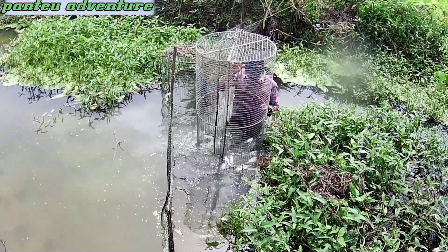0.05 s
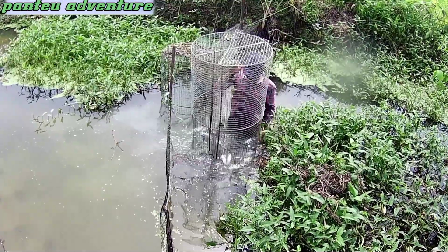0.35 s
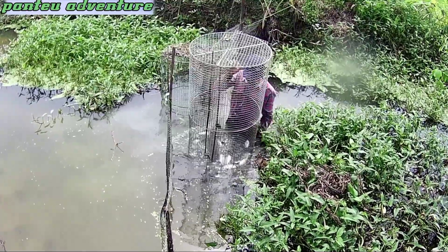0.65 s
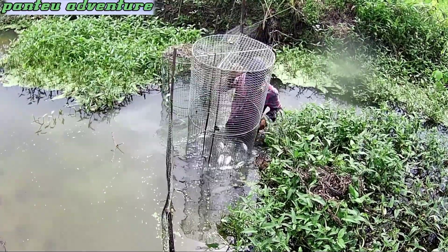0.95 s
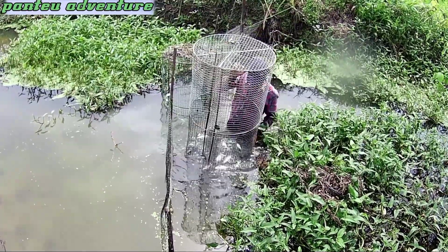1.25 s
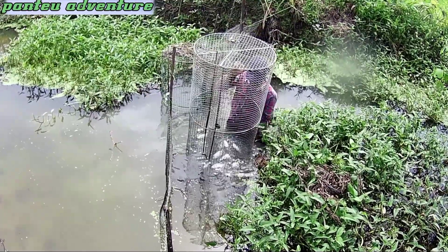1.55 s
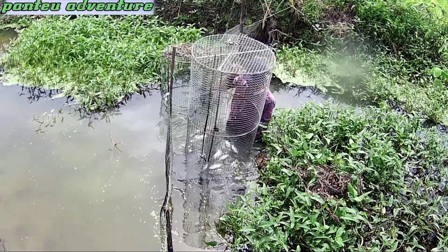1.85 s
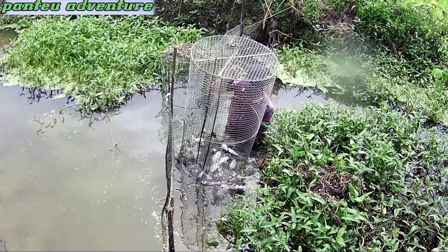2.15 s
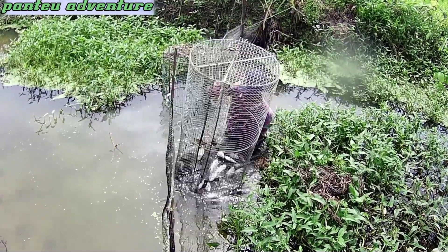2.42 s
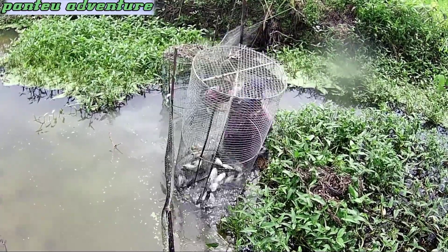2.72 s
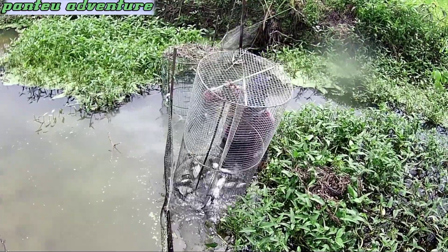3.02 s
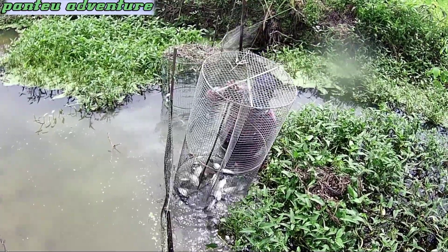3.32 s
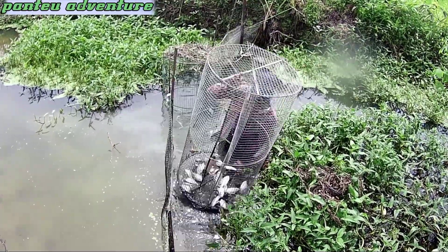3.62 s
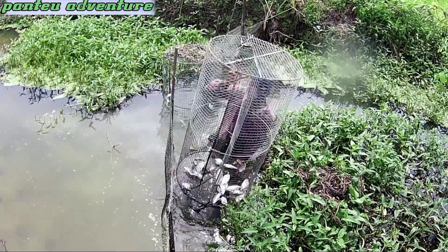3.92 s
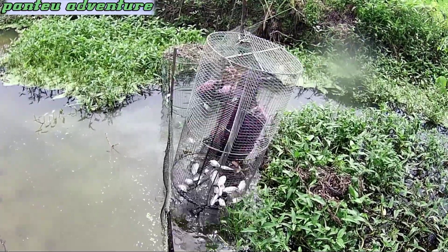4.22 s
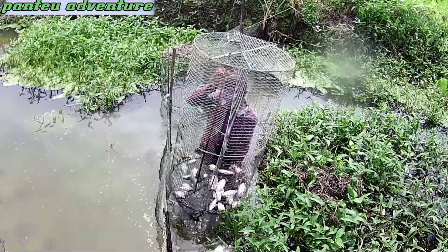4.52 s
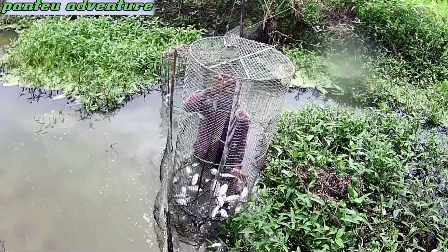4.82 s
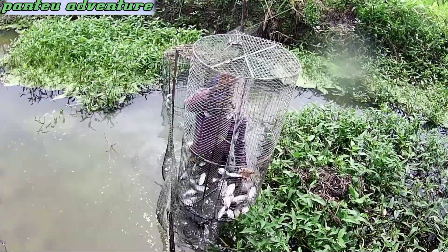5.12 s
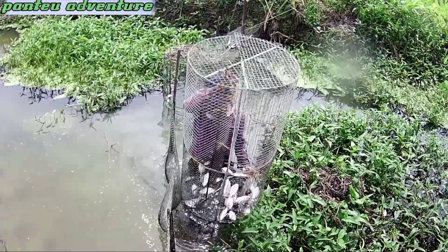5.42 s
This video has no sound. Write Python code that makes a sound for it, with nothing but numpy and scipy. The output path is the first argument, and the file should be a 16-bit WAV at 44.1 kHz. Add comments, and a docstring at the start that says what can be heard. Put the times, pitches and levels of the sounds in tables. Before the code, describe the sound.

Water sloshes and plops in short bursts as someone shifts a wire fish trap in a shallow ditch. After a brief lull, the fish thrash in a run of sharp slaps and splashes, with a few ticks from the wires. The water then settles to drips and bubbles, and the trap scrapes faintly on the bank. Wind rumbles on the microphone in gusts, and everything is heard on the left only.

```python
"""Water surges through a wire fish trap as someone wading in a ditch tips and drags it; the fish thrash.
Slaps throw spray, trapped air rings as bubbles, the wet mesh drips, and the wires tick and scrape.
Gusts rumble on the single microphone, which feeds the left channel only.
A far tone fades and something small chirps in the weeds."""
import sys
import numpy as np
from scipy import signal
from scipy.fft import rfft, irfft
from scipy.io import wavfile
from scipy.ndimage import uniform_filter1d

SR = 44100
rng = np.random.default_rng(int(sys.argv[2]) if len(sys.argv) > 2 else 0)


def to_wav(sig):
    """Store sig (one row per channel, or 1-D mono) as 16-bit WAV at the path in sys.argv[1].

    Samples outside -1..1 are clipped; the rate is SR.
    """
    pcm = np.clip(np.atleast_2d(sig), -1, 1) * 32767
    pcm = np.round(pcm).astype(np.int16)
    wavfile.write(sys.argv[1], SR, pcm.T)  # frames by channels


N = 249914
TIME = np.arange(N) / SR

# Water dribbling from the trap between surges. Each row: time in seconds, level in dB.
DRIBBLE_LEVELS = [(0, -79), (1.1, -80), (1.5, -85), (2.1, -88), (2.45, -75), (3.2, -66), (3.55, -80),
                  (4.8, -80), (5.1, -83.5), (5.67, -84)]


def undb(db):
    """Decibels to gain."""
    return 10 ** (np.asarray(db) / 20)


def unit(x):
    """Scale to rms 1."""
    return x / np.sqrt(np.mean(x ** 2) + 1e-18)


def curve(table):
    """Interpolate (seconds, value) rows to one value per sample."""
    return np.interp(TIME, *np.transpose(table))


def add(out, start_s, sound):
    """Mix a sound in at start_s."""
    i = int(np.clip(start_s * SR, 0, N - 1))
    out[i:i + len(sound)] += sound[:N - i]


def colour(x, spectrum, size=4096):
    """Minimum-phase filter from (Hz, dB) rows; white noise keeps its power."""
    hz, db = np.transpose(spectrum)
    log_hz = np.log(np.maximum(np.arange(size // 2 + 1) * SR / size, 1))
    magnitude = undb(np.interp(log_hz, np.log(np.sort(hz)), db))
    cepstrum = irfft(np.log(magnitude))
    response = irfft(np.exp(rfft(2 * cepstrum[:size // 2], size)))
    return signal.fftconvolve(x, response / np.linalg.norm(response))[:N]


def steady(x, window_s):
    """Hold rms near 1 over the window; faster flutter stays."""
    k = max(int(window_s * SR), 2)
    power = uniform_filter1d(uniform_filter1d(x ** 2, k), k)
    return x / np.sqrt(np.abs(power) + 1e-12)


def flutter(rate_hz):
    """Random values joined by ramps, rms 1."""
    k = max(int(SR / rate_hz), 2)
    steps = np.repeat(rng.standard_normal(N // k + 1), k)
    return unit(uniform_filter1d(steps, k)[:N])


def hold_gain(start_s, hold_s, rise_db_per_s, fall_db_per_s):
    """Gain that reaches 1 at start_s, holds, then falls."""
    before_s = np.maximum(start_s - TIME, 0)
    after_s = np.maximum(TIME - start_s - hold_s, 0)
    return undb(-rise_db_per_s * before_s - fall_db_per_s * after_s)


def pooled_db(gains):
    """Power sum of unrelated sounds, in dB."""
    return 10 * np.log10(sum(g ** 2 for g in gains))


def bubble(hz, t60_s, rise=0.27, onset_cycles=0.85):
    """An air pocket rings; nearing the surface, its pitch climbs by the fraction rise."""
    t = np.arange(int(t60_s * SR) + 2) / SR
    onset = 1 - np.exp(-(t * hz / onset_cycles) ** 2)
    envelope = onset * np.exp(-np.log(1000) * t / t60_s)
    return envelope / envelope.max() * np.sin(2 * np.pi * hz * t * (1 + rise * t / t60_s / 2))


def impacts(per_s, spread_db):
    """Tiny impulses at random times: many weak, a few strong."""
    hits = rng.random(N) < per_s / SR
    signs = rng.choice([-1, 1], N)
    level_db = spread_db * np.minimum(rng.exponential(size=N), 5)
    return unit(hits * signs * undb(level_db))


def froth(low_hz, high_hz, cycles, spread_db, count):
    """A crowd of small, short-lived bubbles."""
    out = np.zeros(N)
    for when, pitch, life, strength in rng.random((count, 4)):
        hz = low_hz * (high_hz / low_hz) ** pitch
        gain = undb(-spread_db * np.log(strength + 0.0042))
        add(out, when * N / SR, gain * bubble(hz, t60_s=cycles * (0.5 + life) / hz))
    return unit(out)


def waterflow(dribble_spray_db=-9.5):
    """Splash and spray levels in dB: each surge starts fast, pours, then drains to a dribble."""
    # Each row: start in seconds, hold in seconds, splash level in dB, spray in dB re splash.
    surges = [(0.0, 0.086, -63, -13), (0.14, 0.075, -67.5, -12.5), (0.297, 0.056, -71, -18),
              (0.867, 0.092, -68.5, -22), (0.967, 0.044, -65, -15.5), (1.068, 0.062, -74.5, -18),
              (2.174, 0.036, -68.5, -4.5), (2.222, 0.04, -55.5, -12.5), (2.294, 0.043, -59.5, -11),
              (2.414, 0.039, -65, -8), (2.658, 0.026, -67, -4.5), (2.715, 0.1, -67.5, -4),
              (2.855, 0.18, -67, -4.5), (3.004, 0.093, -66, -8), (3.083, 0.14, -60.5, -11.5),
              (3.366, 0.022, -60.5, -14), (3.707, 0.037, -71.5, -14), (4.136, 0.3, -74, -26),
              (4.615, 0.092, -74.5, -10)]
    dribble = undb(curve(DRIBBLE_LEVELS))
    splash, spray = [dribble], [dribble * undb(dribble_spray_db)]
    for start_s, hold_s, splash_db, spray_db in surges:
        surge = undb(splash_db) * hold_gain(start_s, hold_s, rise_db_per_s=552, fall_db_per_s=215)
        splash.append(surge)
        spray.append(undb(spray_db) * surge)
    return pooled_db(splash), pooled_db(spray)


def mic_splash(x):
    """Shape x as midrange splashing, coloured by the microphone's resonances."""
    # Each row: frequency in Hz, level in dB.
    mic_splash_spectrum = [(350, -17.5), (650, -7), (860, -4), (1170, -6.5), (1330, -1), (1680, -3),
                           (1920, -0.5), (2080, -2), (2370, 1.5), (2650, -3.5), (2980, -15), (3170, -15.5),
                           (3600, -27.5), (6000, -58.5)]
    return colour(x, mic_splash_spectrum)


def mic_spray(x):
    """Shape x as bright spray, coloured by the microphone's treble resonances."""
    # Each row: frequency in Hz, level in dB.
    mic_spray_spectrum = [(1800, -32.5), (3200, 1), (3750, -9.5), (4450, 3.5), (4800, -0.5), (5700, -17.5),
                          (6300, -13), (6900, -27.5), (7500, -16), (8100, -25.5), (8850, -13), (9700, -24),
                          (11000, -22.5), (15000, -37.5)]
    return colour(x, mic_spray_spectrum)


def sloshing(gurgle_db=-13):
    """Water pours through the mesh in short gushes: drops, bubbles, a lower gurgle and fine spray."""
    splash_db, spray_db = waterflow()
    drops = impacts(per_s=2500, spread_db=0.5)
    bubbles = froth(low_hz=526, high_hz=3033, cycles=47, spread_db=4, count=3000)
    gushes = undb(3.5 * flutter(rate_hz=70))
    splash = steady(mic_splash((drops + undb(-2.5) * bubbles) * gushes), window_s=0.025)
    gurgle = steady(froth(low_hz=382, high_hz=763, cycles=28, spread_db=3, count=500), window_s=0.06)
    fine_drops = impacts(per_s=2300, spread_db=0.5)
    spray = steady(mic_spray(fine_drops * gushes), window_s=0.1)
    return undb(splash_db - 1) * (splash + undb(gurgle_db) * gurgle) + undb(spray_db - 4) * spray


def airflow(breeze_eddy_db=-16.5):
    """Rumble and eddy levels in dB: each gust builds, holds and dies away over the breeze."""
    # Each row: time in seconds, rumble level in dB.
    breeze_levels = [(0, -53), (1.1, -50.5), (1.4, -63.5), (1.85, -68), (2.1, -56), (2.9, -57.5),
                     (3.13, -62.5), (3.5, -57), (3.85, -46), (4.7, -49), (5.05, -59.5), (5.67, -59)]
    # Each row: arrival in seconds, hold in seconds, rumble level in dB, eddy level in dB.
    gusts = [(0.0, .12, -49, -89), (0.288, 0.035, -37, -60), (0.354, 0.052, -43, -61.5),
             (0.496, 0.047, -37.5, -56), (0.644, 0.063, -40.5, -61), (0.796, .17, -40, -63.5),
             (1.036, 0.042, -42.5, -61), (1.193, 0.13, -49, -76), (1.449, 0.021, -52, -68),
             (1.921, 0.1, -53.5, -72), (2.061, 0.043, -48, -82), (2.191, 0.19, -42, -57.5),
             (2.414, 0.06, -47.5, -61), (2.574, 0.024, -45.5, -61.5), (2.653, 0.13, -43, -56),
             (2.851, 0.086, -45, -62), (3.214, 0.041, -59, -83), (3.41, 0.023, -45.5, -56.5),
             (3.531, 0.022, -39, -68.5), (3.601, .035, -33.5, -51.5), (3.654, 0.042, -33, -41.5),
             (3.725, 0.083, -39, -49), (3.964, 0.086, -42, -56.5), (4.082, 0.067, -38, -48.5),
             (4.164, 0.082, -32.5, -42.5), (4.272, 0.067, -35, -49), (4.399, .07, -42.5, -57),
             (4.507, 0.15, -43.5, -75), (4.768, .09, -48.5, -64.5), (5.173, 0.043, -54, -73),
             (5.436, 0.0069, -48.5, -58.5)]
    breeze = undb(curve(breeze_levels))
    rumble, eddies = [breeze], [breeze * undb(breeze_eddy_db)]
    for start_s, hold_s, rumble_db, eddy_db in gusts:
        gust = hold_gain(start_s, hold_s, rise_db_per_s=450.5, fall_db_per_s=328.5)
        rumble.append(undb(rumble_db) * gust)
        eddies.append(undb(eddy_db) * gust)
    return pooled_db(rumble), pooled_db(eddies)


def wind(bass_hz=95, bass_limit_db=-43, swell_db=-58, swell_slope=0.62):
    """Large eddies rumble on the microphone; strong gusts break into finer, fluttering ones."""
    # Large eddies, fine eddies and the deepest pressure swell. Each row: frequency in Hz, level in dB.
    rumble_spectrum = [(10, -44), (25, -20), (50, -7), (75, 2), (110, 2), (150, -1.5), (185, -4.5),
                       (250, -13.5), (330, -20), (500, -42.5), (900, -52), (1500, -100)]
    eddy_spectrum = [(40, -45.5), (130, -12.5), (230, 5), (330, 2.5), (450, 0.5), (600, -2), (780, -11.5),
                     (1000, -25.5), (1500, -49), (3000, -57), (6000, -87)]
    swell_spectrum = [(5, -28.5), (15, -15.5), (25, -14.5), (45, 1), (75, -2), (110, -7), (200, -34),
                      (700, -110)]
    rumble_db, eddy_db = airflow()
    rumble = steady(colour(rng.standard_normal(N), rumble_spectrum), window_s=0.043)
    turbulence = rng.standard_normal(N) * undb(4.3 * flutter(rate_hz=130))
    eddies = steady(colour(turbulence, eddy_spectrum), window_s=0.035)
    swell = steady(colour(rng.standard_normal(N), swell_spectrum), window_s=0.31)
    # Faster air makes smaller eddies, so the swell grows less than the rest.
    swell_gain = undb(swell_db + swell_slope * (rumble_db - rumble_db.mean()))
    bass = signal.sosfiltfilt(signal.butter(3, bass_hz, fs=SR, output="sos"), rumble)
    limited_rumble = undb(rumble_db) * (rumble - bass) + undb(np.minimum(rumble_db, bass_limit_db)) * bass
    return limited_rumble + undb(eddy_db + 0.23) * eddies + swell_gain * swell


def outdoor_air(level_db=-69.5):
    """Quiet, steady outdoor air and hiss."""
    # Each row: frequency in Hz, level in dB.
    air_spectrum = [(30, 2), (150, -2.5), (300, -11.5), (650, -13), (1000, -24.5), (1600, -29),
                    (2200, -33.5), (3100, -33), (3900, -33), (4600, -32), (5500, -34), (15500, -32.5)]
    return undb(level_db) * colour(rng.standard_normal(N), air_spectrum)


def far_tone(hz=739, waver=0.00099):
    """A faint, nearly pure tone like a far horn, wavering on the wind."""
    # Each row: time in seconds, level in dB.
    tone_levels = [(0, -73), (.25, -73), (.33, -90), (.44, -69), (.52, -85), (.7, -130)]
    pitch_hz = hz * (1 + waver * flutter(rate_hz=14))
    return undb(curve(tone_levels)) * unit(np.sin(2 * np.pi * np.cumsum(pitch_hz) / SR))


def plops(twin_db=-11, twin_ratio=1.13, scatter_s=0.035, scatter_db=-11.5):
    """Single larger bubbles from drips and fish, scattered a little by the banks."""
    # Each row: start in seconds, pitch in Hz, level in dB, t60 in seconds, fractional pitch rise.
    bubbles = [(0.0644, 2056, -58, 0.078, 0), (0.1377, 1760, -58, .027, .12),
               (0.203, 2070, -58.5, 0.081, 0.19), (0.289, 1270, -57, 0.048, 0.31),
               (0.3204, 2120, -52, 0.028, .16), (0.3312, 810, -54.5, 0.043, 0.12),
               (0.41, 1110, -65, 0.073, .33), (0.882, 1560, -53.5, 0.033, 0.22),
               (0.9126, 1291, -49, 0.057, 0.072), (1.0019, 793, -47, 0.047, 0.21),
               (1.0842, 2281, -61, 0.028, .05), (1.139, 848, -57, 0.039, 0.076),
               (1.1513, 2320, -53.5, 0.019, 0.27), (1.2174, 753, -59.5, .11, 0.044),
               (1.3635, 770, -50, 0.043, 0), (1.6359, 2030, -68.5, .031, 0),
               (1.972, 623, -64, 0.066, 0.018), (2.1703, 1630, -51, .026, .12),
               (2.1996, 2060, -43, 0.043, 0), (2.4243, 1820, -53, 0.031, 0.27),
               (2.5141, 1470, -61.5, 0.065, 0.033), (2.813, 1336, -49.5, 0.027, .12),
               (2.91, 2290, -47, 0.044, 0.26), (2.914, 4390, -51, 0.03, 0.3),
               (2.967, 1045, -54, 0.031, 0.25), (3.0973, 1850, -45.5, 0.023, .12),
               (3.1416, 1850, -41.5, 0.0094, .09), (3.201, 1440, -46.5, .022, 0),
               (3.3381, 856, -49.5, 0.21, 0.08), (3.369, 2260, -35, 0.023, 0.24),
               (3.7087, 1400, -59, .055, .04), (3.7805, 2240, -59.5, 0.037, 0.051),
               (4.321, 1357, -58, .08, 0.061), (4.366, 1610, -57.5, 0.095, 0.28),
               (4.4722, 1990, -61.5, 0.05, 0.099), (4.5204, 2950, -63, 0.044, 0),
               (4.587, 2130, -55.5, 0.013, 0.11), (4.624, 1835, -52, .03, 0), (4.666, 1290, -60, .1, 0.047),
               (4.7011, 528, -48.5, 0.16, 0.5), (4.9519, 2180, -68.5, 0.033, .06),
               (5.3687, 1550, -71, 0.07, 0.096)]
    out = np.zeros(N)
    for start_s, hz, db, t60_s, rise in bubbles:
        add(out, start_s, undb(db - 1.5) * bubble(hz, t60_s, rise))
        # A smaller twin pinches off just after and roughens the ring.
        detune, lag = rng.standard_normal(2)
        twin_hz = hz * twin_ratio * (1 + 0.06 * detune)
        add(out, start_s + 0.0024 * abs(lag), undb(db + twin_db) * bubble(twin_hz, t60_s, rise))
    t = np.arange(SR // 4) / SR
    banks = rng.standard_normal(len(t)) * np.exp(-t / scatter_s)
    return out + undb(scatter_db) * signal.fftconvolve(out, banks / np.linalg.norm(banks))[:N]


def slaps(crack_s=0.0006, patter_s=0.011, patter_db=-11, thud_db=-7):
    """Fish tails and mesh slap the surface: a crack over a hollow thud, then a patter of thrown water."""
    # Each row: start in seconds, level in dB, spray in dB re that level.
    hits = [(0.067, -49, -18), (0.135, -49.5, -28), (0.3726, -57, -7), (0.511, -49.5, -17.5),
            (0.603, -59.5, -20), (0.639, -66, -4), (0.9403, -56, -27), (1.137, -52, -24),
            (1.3622, -54.5, -20), (2.1274, -48, -5), (2.155, -38, -11.5), (2.2352, -43, -21),
            (2.324, -46, -15), (2.4089, -57.5, -2), (2.55, -44.5, -28), (2.676, -46.5, -9.5),
            (2.6487, -45, -25), (2.7185, -36.5, -16.5), (2.7585, -37.5, -18), (2.7919, -38, -17.5),
            (2.8517, -43, -16), (2.8893, -42, -20), (2.9417, -40, -14.5), (2.977, -48.5, -7.5),
            (3.0321, -36.5, -23), (3.0859, -43, -22), (3.1213, -44, -27), (3.166, -38, -20),
            (3.2011, -43.5, -33), (4.1302, -48, -21.5), (4.364, -53, -27), (4.6618, -47, -30)]
    # Each row: frequency in Hz, level in dB.
    thud_spectrum = [(120, -18), (350, -7.5), (750, -6), (1100, -9), (2500, -45)]
    coarse, fine = np.zeros(N), np.zeros(N)
    t = np.arange(SR // 16) / SR
    for start_s, db, spray_db in hits:
        crack = rng.standard_normal((2, len(t))) * np.exp(-t / crack_s)
        grains = rng.standard_normal((2, len(t))) * np.abs(rng.standard_normal(len(t)))
        coarse_burst, fine_burst = crack + undb(patter_db) * grains * np.exp(-t / patter_s)
        # A slap that throws mostly spray has little body.
        body_gain = undb(db - 6.5) / np.sqrt(1 + undb(2 * spray_db + 5))
        add(coarse, start_s, body_gain * coarse_burst)
        add(fine, start_s, undb(db + spray_db) * fine_burst)
    return mic_splash(coarse) + undb(thud_db) * colour(coarse, thud_spectrum) + mic_spray(fine)


def drips(count=24, low_hz=1455, high_hz=3050, mean_t60_s=0.072, over_dribble_db=6):
    """Faint drips fall from the wet mesh at random, each ringing one small bubble."""
    out = np.zeros(N)
    for when, pitch, life, strength in rng.random((count, 4)):
        hz = low_hz * (high_hz / low_hz) ** pitch
        add(out, when * N / SR, (0.5 + strength) * bubble(hz, mean_t60_s * (0.5 + life), rise=0.14))
    return out * undb(curve(DRIBBLE_LEVELS) + over_dribble_db)


def buffets(width_cycles=0.99):
    """Single hard buffets of air hit the microphone, each a short, low pressure pulse."""
    # Each row: centre in seconds, level in dB, pitch in Hz.
    pulses = [(0.506, -28.5, 190), (0.645, -35, 158), (0.796, -27.5, 127), (2.21, -34.5, 200),
              (2.355, -29.5, 125), (2.776, -28, 125), (3.624, -39, 140), (3.673, -28, 260),
              (4.164, -27, 170), (4.181, -29, 377), (4.209, -27, 199), (4.835, -31.5, 135),
              (5.447, -35.5, 100)]
    out = np.zeros(N)
    for centre_s, db, hz in pulses:
        cycles = np.arange(-2, 2, hz / SR)
        pulse = np.cos(2 * np.pi * cycles) * np.exp(-(cycles / width_cycles) ** 2)
        add(out, centre_s - 2 / hz, undb(db - 4) * pulse)
    return out


def chirps(hz=7300, rise=0.041, length_s=0.0066):
    """Thin chirps in the weeds scoop up to pitch and keep rising slightly."""
    # Each row: start in seconds, level in dB.
    calls = [(.514, -78), (1.78, -78), (3.316, -72), (3.837, -73), (4.048, -72), (4.546, -73.5),
             (4.809, -68.5)]
    out = np.zeros(N)
    progress = np.linspace(0, 1, int(length_s * SR))
    glide = 1 + rise * progress - 0.25 * np.exp(-16 * progress)
    envelope = np.sqrt(np.abs(np.sin(np.pi * progress)))
    for start_s, db in calls:
        pitch_hz = hz * (1 + 0.01 * rng.standard_normal()) * glide
        add(out, start_s, undb(db) * envelope * np.sin(2 * np.pi * np.cumsum(pitch_hz) / SR))
    return out


def wire_ticks(decay_s=0.00091):
    """Wires snap against each other as the trap is tipped."""
    # Each row: start in seconds, level in dB.
    ticks = [(2.1294, -44.5), (2.1557, -70), (2.7188, -69), (2.761, -50), (2.7905, -58), (2.976, -57),
             (3.1665, -59)]
    # Each row: frequency in Hz, level in dB.
    tick_spectrum = [(1200, -21), (2500, -12), (4500, 2), (6200, -1), (7500, -26), (8900, -16),
                     (10500, 2.5), (13000, -15), (15000, -2.5)]
    out = np.zeros(N)
    t = np.arange(SR // 50) / SR
    for start_s, db in ticks:
        add(out, start_s, undb(db - 6) * rng.standard_normal(len(t)) * np.exp(-t / decay_s))
    return colour(out, tick_spectrum)


def scrape():
    """The trap drags along the bank; many tiny slips ring its frame."""
    # Each row: time in seconds, level in dB.
    scrape_levels = [(4.08, -110), (4.14, -74), (4.2, -74.5), (4.28, -65.5), (4.34, -66.5), (4.39, -88),
                     (4.48, -110)]
    # Each row: resonance in Hz, bandwidth in Hz, level in dB.
    frame_modes = [(1070, 250, -2), (1270, 87, -5), (1570, 200, -5.5), (2485, 260, -7.5), (2570, 140, -20)]
    slips = impacts(per_s=1500, spread_db=2)
    frame = np.zeros(N)
    for hz, width_hz, db in frame_modes:
        mode = signal.butter(2, [hz - width_hz / 2, hz + width_hz / 2], "band", fs=SR, output="sos")
        frame += undb(db) * unit(signal.sosfilt(mode, slips))
    return undb(curve(scrape_levels)) * unit(frame)


def scene():
    """All sources reach one microphone on the left channel; the right is silent."""
    air = outdoor_air() + wind() + buffets()
    water = sloshing() + slaps() + plops() + drips()
    trap = wire_ticks() + scrape()
    microphone = air + water + trap + chirps() + far_tone()
    return np.array([2 * microphone, np.zeros(N)])


def record(dry, cutoff_hz=15500):
    """A steep low-pass cuts the top treble."""
    return signal.sosfilt(signal.ellip(10, 0.1, 70, cutoff_hz, fs=SR, output="sos"), dry)


dry = scene()
out = record(dry)
to_wav(out)
```